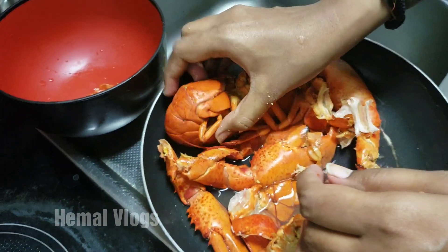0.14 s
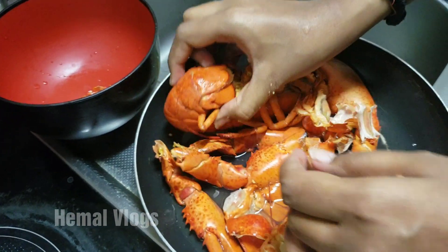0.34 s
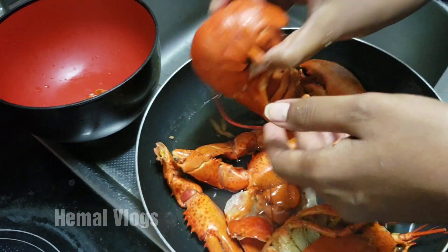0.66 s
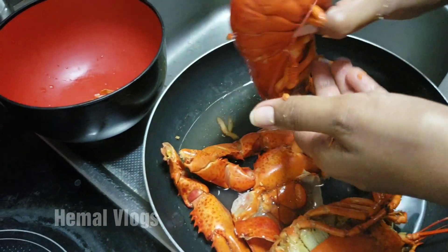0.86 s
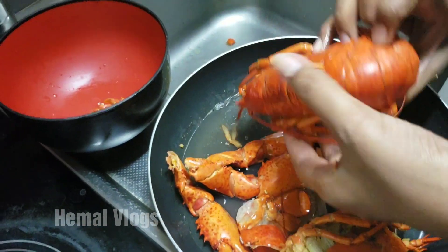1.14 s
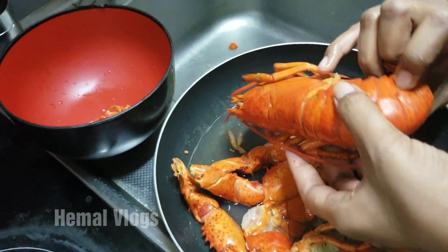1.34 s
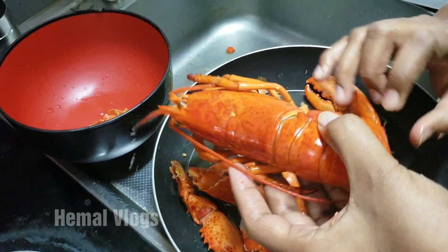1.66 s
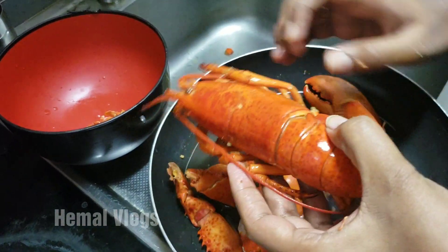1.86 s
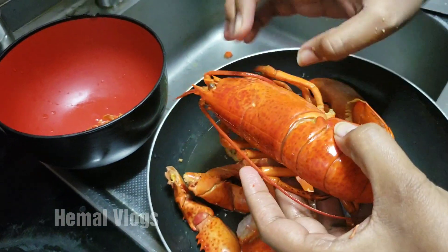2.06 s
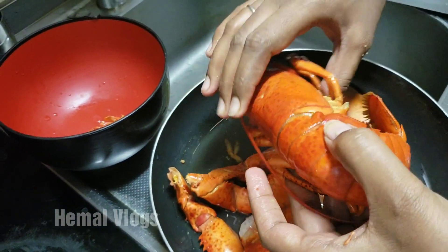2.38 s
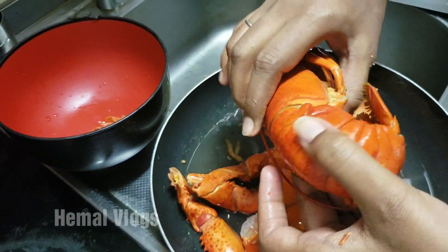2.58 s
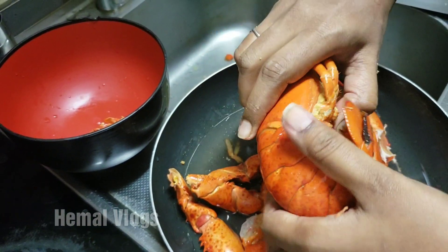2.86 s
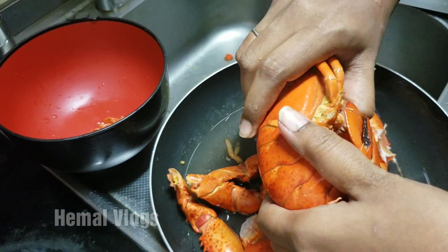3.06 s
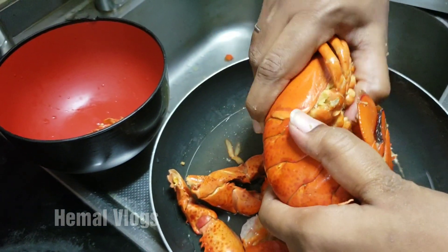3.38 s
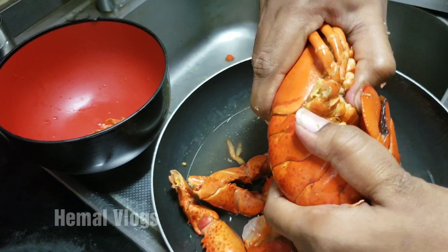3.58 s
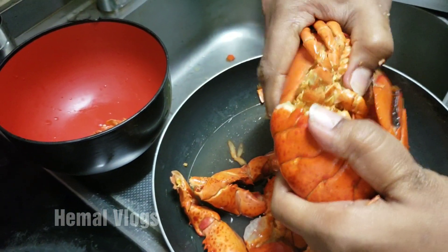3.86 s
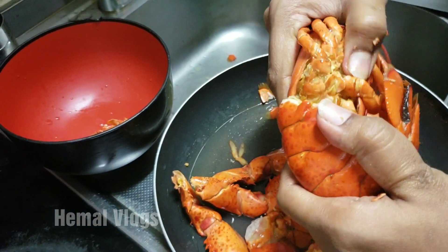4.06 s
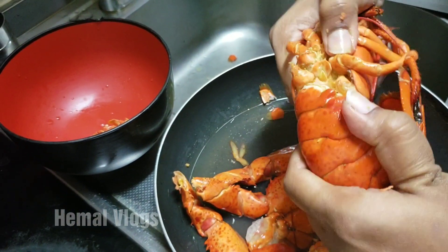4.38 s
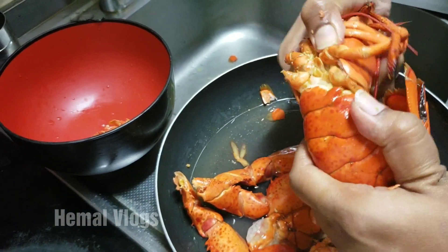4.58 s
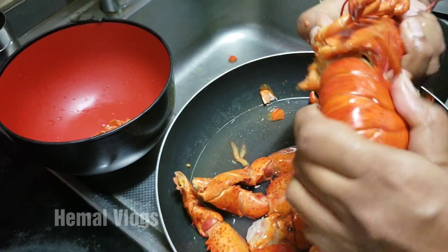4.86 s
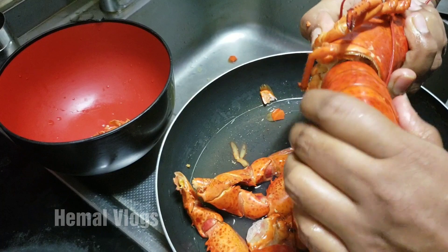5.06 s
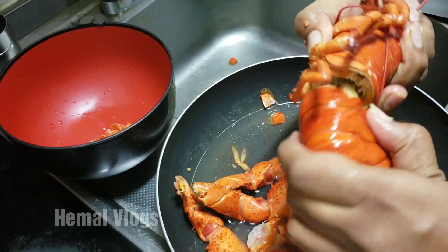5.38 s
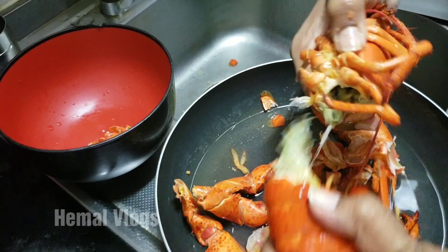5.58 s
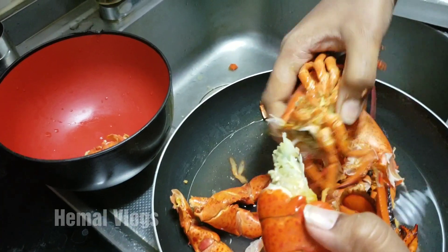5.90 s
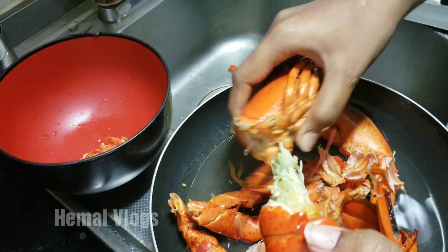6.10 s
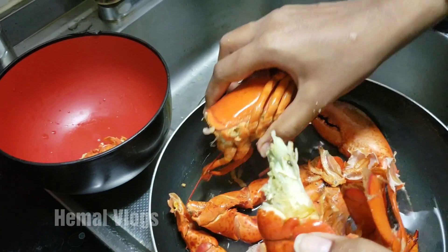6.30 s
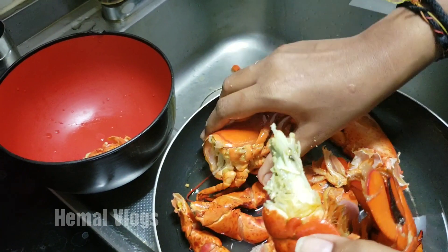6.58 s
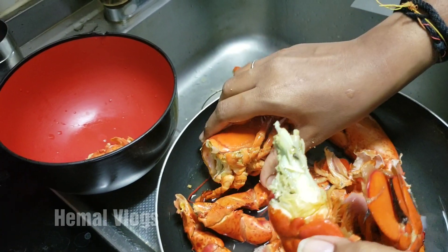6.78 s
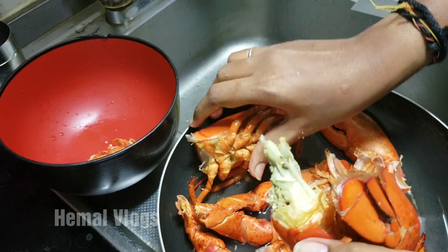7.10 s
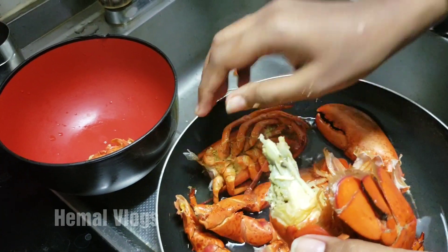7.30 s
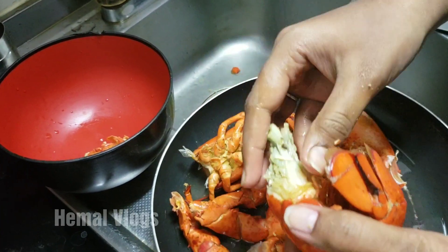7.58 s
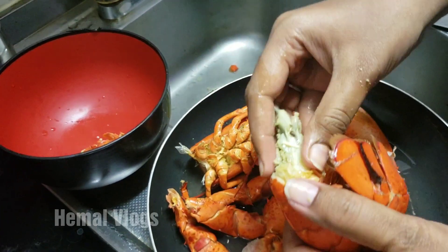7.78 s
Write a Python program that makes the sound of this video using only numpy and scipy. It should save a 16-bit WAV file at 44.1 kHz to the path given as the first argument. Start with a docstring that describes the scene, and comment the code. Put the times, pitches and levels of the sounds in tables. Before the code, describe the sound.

Sharp brittle cracks of a cooked lobster shell, with wet crackling, crunches and soft pan thumps close by in a small humming kitchen.

```python
"""Cracking shellfish in a small kitchen

Hands crack a cooked shellfish and tear out its wet meat over a pan in a small hard-walled kitchen.
Each crack is a burst of tiny fractures that rings the shell; pieces of it crunch and snap, low or high.
Legs and meat crackle and rub in dense clicks, the pan thumps and rattles in the sink as low tones and noise,
and an appliance hums in the room as shaped noise. A small two-port microphone stands close by."""
import sys
import numpy as np
from scipy import signal
from scipy.fft import rfft, irfft
from scipy.io import wavfile
from scipy.ndimage import uniform_filter1d

SR = 44100
rng = np.random.default_rng(int(sys.argv[2]) if len(sys.argv) > 2 else 0)


def unload_wav(signal):
    """Save mono or channel-first audio to the path in sys.argv[1] as 16-bit WAV at rate SR, clipped to [-1, 1]."""
    wavfile.write(
        sys.argv[1],
        SR,
        np.round(np.clip(np.atleast_2d(signal).T, -1, 1) * 32767).astype(np.int16),
    )


N = 350154   # samples, about 7.9 s

# Breaks of the shell. Each row: start in seconds, level in dB, thick wall in dB relative to that level,
# splinter in dB relative to it, time in seconds for the fractures to die by 60 dB.
CRACKS = [(0.274, -34.5, -12, -28, 0.038), (0.332, -30.5, -13, -27, 0.041), (0.612, -39.5, -19, -18, 0.099),
          (0.7555, -46, 7, 2, 0.043), (0.869, -38, -4.5, -7, 0.11), (1.142, -9, -22, 1, 0.069),
          (1.3605, -30.5, -15, 9, 0.018), (1.371, -44.5, -3.5, 11, 0.086), (1.4441, -22, -40, 12.5, 0.053),
          (1.449, -35, -28, 21.5, 0.04), (1.4501, -12.5, -55, -13, 0.054), (1.4606, -20, -46, -24, 0.027),
          (1.4752, -24, -40, 2, 0.053), (1.5143, -36.5, 0.5, 6, 0.035), (1.684, -63.5, 13, -20, 0.034),
          (3.015, -48, -18, 14, 0.079), (3.1316, -53, -25, 12, 0.1), (3.1659, -37.5, -14, 11, 0.03),
          (3.495, -60, -15, -1, 0.13), (3.595, -37.5, -20, -25, 0.078), (3.6274, -42.5, -19, 0, 0.3),
          (3.685, -27.5, -3.5, -5.5, 0.092), (3.7498, -37, -4, -19, 0.044), (3.758, -19.5, -4.5, -2, 0.067),
          (3.839, -29, -11.5, 0, 0.061), (3.8853, -10.5, -11, -1.5, 0.074),
          (3.8951, -18.5, -0.5, -9, 0.039), (3.923, -31, -22, 20, 0.012), (3.9292, -27, -1.5, -21, 0.13),
          (3.956, -26, -7, -2, 0.1), (4.034, -45, -30, 8, 0.055), (4.156, -33, -3, 1, 0.041),
          (4.1683, -54, -22, 23, 0.066), (4.193, -23.5, -11, 3, 0.07), (4.2524, -41.5, 1, -22, 0.049),
          (4.3283, -24, -2, 0.5, 0.084), (4.4049, -26, 2, -2.5, 0.077), (4.4179, -38.5, 12.5, -6, 0.016),
          (4.462, -37.5, 6.5, -2, 0.023), (4.4783, -40, 7.5, 2, 0.073), (4.6405, -31.5, -15, 10.5, 0.017),
          (4.7278, -31.5, -1.5, -14, 0.15), (4.8339, -36, -24, -2, 0.04), (4.8914, -24.5, -8.5, 2.5, 0.051),
          (5.552, -26.5, -15, 2, 0.032), (5.602, -40, -9, 7, 0.056), (6.112, -58, -29, 20, 0.046),
          (6.233, -50.5, -36.5, 2, 0.16), (6.6636, -23, -7, 3, 0.081), (7.3285, -26.5, -11, -4, 0.11)]
# The hollow body knocks as a large piece gives way. Each row: start in seconds, level in dB.
KNOCKS = [(0.282, -52), (0.61, -45), (3.9, -44), (3.957, -34)]
# A piece of shell snaps, low or high. Each row: start in seconds, level in dB, pitch in Hz, width in Hz per pass.
SNAPS = [(1.4445, -22, 9000, 6000), (3.904, -19, 12900, 2500), (3.9152, -17, 13200, 3000),
         (3.9217, -14, 13300, 1500), (3.9572, -20, 12500, 2000), (3.9578, -26, 950, 500),
         (3.959, -31, 350, 250), (4.1933, -24, 6000, 4000), (4.4186, -29, 2500, 2000)]
# Short crunches of flakes or joints, and a longer low rub, each at a pitch of its own.
# Each row: start in seconds, level in dB, pitch in Hz, width in Hz per pass, length in seconds before it dies away.
CRUNCHES = [(0.042, -62.5, 614, 520, 0.37), (0.154, -59, 6500, 2500, 0.008), (0.27, -55, 1780, 700, 0.0082),
            (0.314, -58, 2070, 600, 0.0049), (0.645, -55.5, 4440, 500, 0.068),
            (0.752, -55, 1800, 400, 0.014), (0.794, -51.5, 4660, 700, 0.0096),
            (0.795, -54, 6200, 900, 0.005), (1.955, -70.5, 2320, 950, 0.028),
            (2.988, -67, 2300, 1200, 0.011), (3.016, -53, 6100, 1100, 0.02),
            (3.017, -55.5, 2470, 800, 0.02), (3.157, -52, 6900, 1500, 0.011),
            (3.748, -35, 6700, 1800, 0.001), (3.894, -33, 12500, 2500, 0.003),
            (3.927, -48, 13000, 2500, 0.003), (3.933, -40.5, 990, 500, 0.003),
            (3.9563, -51, 930, 450, 0.0048), (3.957, -51.5, 297, 199, 0.012),
            (3.9572, -33, 12300, 2500, 0.002), (4.281, -65, 2400, 900, 0.0075),
            (1.454, -38.5, 4580, 900, 0.033), (1.374, -51.5, 4600, 900, 0.015),
            (1.52, -51, 1500, 900, 0.0056), (6.654, -53.5, 654, 498, 0.02), (4.252, -52, 5170, 900, 0.004),
            (4.258, -66, 2390, 600, 0.017), (4.318, -68, 2600, 500, 0.012),
            (4.404, -39.5, 5230, 800, 0.0043), (4.457, -47, 6630, 1500, 0.01),
            (4.481, -48, 2340, 900, 0.0094), (4.708, -51, 6000, 3000, 0.0054),
            (4.732, -47, 2300, 700, 0.016), (4.74, -40, 14300, 2500, 0.012),
            (4.834, -45, 11800, 2200, 0.006), (4.848, -46, 4730, 800, 0.026),
            (4.892, -40, 5100, 900, 0.011), (4.947, -48, 12300, 2500, 0.01), (4.964, -49, 4970, 450, 0.013),
            (5.04, -65, 13200, 2500, 0.0069), (5.534, -62, 5000, 3000, 0.0035),
            (5.554, -44.5, 3080, 700, 0.0073), (5.633, -52, 6400, 900, 0.015),
            (5.684, -52.5, 6300, 1600, 0.0046), (6.024, -48, 13800, 2600, 0.0086),
            (6.112, -44, 7060, 1500, 0.0084), (6.178, -62, 5500, 1500, 0.004),
            (6.229, -52.5, 9570, 4020, 0.025), (6.413, -52, 14000, 2600, 0.006),
            (7.05, -67.5, 5940, 1510, 0.049), (4.418, -40.5, 1210, 895, 0.0057),
            (4.416, -58, 2200, 700, 0.022), (7.227, -61, 2300, 500, 0.0058),
            (7.229, -57.5, 1240, 300, 0.0091), (7.319, -51, 1210, 302, 0.043),
            (7.331, -37, 6100, 1410, 0.0065)]
# Broad resonances of hollow body, thick wall, thin plate and splinter.
# Each row: pitch in Hz, width in Hz per pass, gain in dB per pass.
BODY = [(320, 260, 10.5), (572, 125, 14.5), (760, 500, 9.5)]
WALL = [(1173, 756, -0.5), (1935, 404, 5), (2510, 1480, 1)]
PLATE = [(3408, 1300, 1.7), (4440, 2180, 5.02), (6890, 2570, 3.27)]
SPLINTER = [(9680, 5100, -45), (12700, 7700, 8), (15500, 4900, -1)]
# Bouts of handling shell and meat, a list of rows for each bout.
# Each row: time in seconds, rub level in dB, thick wall in dB relative to the rub.
HANDLING = [
    [(0.0, -57.5, -3), (0.18, -61.5, -6), (0.388, -66.5, -7), (0.5, -66.5, -9)],
    [(0.5, -70.5, -20), (0.774, -61.5, -16), (0.898, -68.5, -3), (1.1, -79, -10)],
    [(1.5, -63, -8), (1.656, -73, -4), (1.8, -106, -11)],
    [(2.95, -90, -1), (3.248, -91, -6), (3.422, -67.5, -5.5), (3.502, -100, -9), (3.6, -69, -1)],
    [(3.6, -77.5, 3.5), (3.762, -57, -6), (3.862, -83, 12), (4.008, -61.5, -20), (4.15, -63, -11)],
    [(4.15, -91, -1), (4.22, -65, 0), (4.344, -69, 3), (4.46, -63, 0), (4.6, -100, -13)],
    [(4.6, -62.5, -6), (4.7, -62.5, -11), (4.81, -55, -15), (4.848, -58.5, 3), (4.98, -71, 1),
     (5.1, -71, -4.5)],
    [(5.1, -68, -10), (5.218, -78.5, -3), (5.452, -83, -2.5), (5.754, -72.5, -4.5), (5.8, -86, -21)],
    [(5.8, -72, -17), (5.948, -86, -18), (6.1, -100, -12)],
    [(6.6, -75, -16), (6.674, -68, 8), (6.794, -79, -10), (6.85, -90, -9)],
    [(7.0, -90.5, -15), (7.116, -114, -16), (7.248, -71, 5), (7.5, -109, -2)],
]
# Meat tears or shell scrapes in one stroke. Each row: time of the height in seconds, rub level in dB,
# thick wall in dB relative to the rub, splinter in dB relative to it, rise in seconds, fall in seconds.
TEARS = [(0.07, -70.5, -6, 22, 0.067, 0.062), (0.33, -54.5, -5, -5, 0.16, 0.094),
         (0.69, -54.5, -2, -15, 0.12, 0.18), (0.8, -63, 2, -17, 0.037, 0.041),
         (1.531, -57.5, 1.5, -10, 0.047, 0.068), (3.025, -57, -9.5, -2.5, 0.03, 0.08),
         (3.168, -57, -6, 3.5, 0.025, 0.071), (3.53, -60, -15, -9, 0.031, 0.05),
         (4.166, -53.5, 0, -9, 0.014, 0.005), (4.418, -50.5, -5, 1, 0.071, 0.1),
         (4.737, -44, -6, -1, 0.04, 0.084), (4.84, -44, -22, -7, 0.037, 0.094),
         (4.89, -56, -14, 3, 0.034, 0.028), (4.967, -44.5, -8.5, -1.5, 0.086, 0.014),
         (5.598, -46, -5, -5, 0.035, 0.04), (5.643, -51, -11, 3.5, 0.08, 0.059),
         (5.951, -68.5, -11.5, 2, 0.068, 0.025), (6.646, -46, -14.5, -9, 0.018, 0.017),
         (7.07, -66.5, -14.5, 5.5, 0.034, 0.051), (7.226, -57.5, -7, -3.5, 0.0085, 0.12),
         (7.331, -48, 2, -2, 0.081, 0.057)]
# Pan knocked. Each row: start in seconds, level in dB, pitch in Hz.
THUMPS = [(0.594, -58, 90), (2.758, -41.5, 85), (6.667, -30.5, 111.5), (7.098, -46, 144.5),
          (7.246, -35.5, 60.6), (7.378, -40.5, 206)]
# Hands jolt pan and sink. Each row: time of the height in seconds, rumble in dB, rattle in dB,
# rise in seconds, fall in seconds.
JOLTS = [(0.2, -52, -52, 0.73, 0.68), (0.35, -65, -52.5, 0.16, 0.09), (0.599, -51, -50, 0.015, 0.078),
         (0.75, -64, -59.5, 0.16, 0.23), (1.77, -58, -63, 0.062, 0.054), (2, -52.5, -68.5, 0.058, 0.027),
         (2.821, -58.5, -64, 0.037, 0.47), (3.89, -59, -54, 0.012, 0.11), (5.59, -53, -62, 0.052, 0.063),
         (6.683, -39, -49, 0.028, 0.15), (7.1, -62.5, -62, 0.29, 0.096), (7.28, -53.5, -53, 0.12, 0.17),
         (7.38, -55.5, -63, 0.1, 0.27)]
# Spectra of the pan's rumble and rattle. Each row: frequency in Hz, relative density in dB per Hz.
RUMBLE_COLOUR = [(18, -30.5), (30, -8), (46, -1), (59, 3.5), (140, -3), (180, -54.5), (310, -120)]
RATTLE_COLOUR = [(82, -46.5), (140, 3), (258, -7), (296, 3.5), (420, -15.5), (550, -23.5), (920, -120)]
# Spectrum of the appliance. Each row: frequency in Hz, relative density in dB per Hz.
HUM_COLOUR = [(15, -49), (25, -26.5), (38, -26.5), (87, -1), (161, -27), (301, -17.5), (384, -23.5),
              (545, -18), (936, -34.5), (1100, -32), (1940, -40.5), (2350, -32), (2550, -43.5),
              (5730, -34.5), (16000, -35)]
# Fan resonances. Each row: pitch in Hz, width in Hz, level in dB before it wavers.
HUM_PEAKS = [(333.8, 6.9, -77.5), (529.2, 26.7, -72.5)]
# How alike noise is at the two ports. Each row: frequency in Hz, left-right likeness from 0 to 1.
LIKENESS = [(60, 0.91), (130, 0.85), (290, 0.65), (640, 0), (1400, 0), (15000, 0)]
# Colour of the two ports. Each row: frequency in Hz, left minus right in dB.
PORT_TILT = [(60, 0.5), (150, 4), (380, -6), (950, 0.5), (2380, -1.5), (5980, -3.5), (15000, -8)]

CRACK_LEVEL_DB, FIRST_BREAK_DB = -13.0, 15   # all cracks; first break over the rms of the shower
BODY_FOLLOWS, BODY_UNDER_DB = 0.93, -13.5    # the deeper the break, the more the hollow body joins in
KNOCK_T60_S = 0.02
BODY_SHARED = 0.48   # the share of the hollow body's force that both ports hear in common
SPREAD = 0.95        # power share of the small fractures that each port hears on its own
PIECE_LOW_HZ, PIECE_HIGH_HZ, PIECE_WIDTH_HZ, PIECE_DB = 3200, 8000, 220, -9
CRUNCH_RISE_S, CRUNCH_T60_S, CRUNCH_ONSET_DB = 0.001, 0.014, 13   # first click over the row's level
RUB_BODY_UNDER_DB, RUB_SPLINTER_DB = -7.5, 1.5   # body re wall; splinter re rub, outside the tears
COLOUR_WANDER_DB = 2.5   # the rubbing moves over thick and thin parts of the shell
STROKE_RANGE_DB = 20     # a stroke changes this much over its rise or fall time
THUMP_T60_S, THUMP_SWELL_S = 0.17, 0.0068   # a soft contact
REST_RUMBLE_DB, REST_RATTLE_DB, REST_WAVER_DB = -64.5, -77, 2   # the pan is never quite still
ROOM_T60_S, ROOM_DB, WALL_CUT_HZ = .12, -10.5, 7000
LATE_T60_S, LATE_DB = 0.27, -7   # the fainter, longer tail of the room beyond the sink
HUM_DB, HUM_WAVER_DB, THROB_DB = -64, .8, 4.5
PORT_LAG_S = .00005
NOTCH_HZ, NOTCH_WIDTH_HZ, NOTCH_DB = 8710, 2990, -7.5
PEAK_TOP, TOP_HZ = .34, 16000   # ceiling of the rounded peaks; treble edge


def cracks():
    """A first break, then a dying shower of small fractures; each part of the shell gets its own."""
    force = np.zeros((4, 2, N))   # body, wall, plate, splinter; left and right
    t = np.arange(SR // 4) / SR
    shower = np.array([scattered(1200, spread_db=4.5) for part in force])
    for s, level_db, depth_db, splinter_db, t60 in CRACKS:
        i = round(s * SR)
        burst = shower[:, :, i:i + len(t)] * from_db(-60 * t[:N - i] / t60)
        burst[:, :, 0] = from_db(FIRST_BREAK_DB)
        body_db = BODY_FOLLOWS * depth_db + BODY_UNDER_DB
        colour_db = np.array([body_db, depth_db, 0, splinter_db])
        colour = from_db(level_db + CRACK_LEVEL_DB + colour_db)
        force[:, :, i:i + len(t)] += colour[:, None, None] * burst
    add_knocks(force[0], shower[0, 0], t)
    return shell(force) + pieces(force[2])


def add_knocks(body_force, shower, t):
    """A large piece gives way: a very short run of fractures, alike at both ports, drives the body."""
    for s, level_db in KNOCKS:
        i = round(s * SR)
        fall = from_db(level_db - 60 * t[:N - i] / KNOCK_T60_S)
        body_force[:, i:i + len(t)] += shower[i:i + len(t)] * fall


def shell(force):
    """The force on each part of the shell rings that part's broad resonances."""
    body, *others = force
    common = body.sum(axis=0) / np.sqrt(2)
    body = (1 - BODY_SHARED) * body + BODY_SHARED * common
    groups = (BODY, WALL, PLATE, SPLINTER)
    return sum(ring_twice(f, modes) for f, modes in zip([body, *others], groups))


def pieces(force, count=5):
    """Each crack frees pieces of its own size: narrow resonances at chance pitches that ring briefly."""
    out, span, click = np.zeros((2, N)), SR // 8, np.eye(1, 3000)[0]
    chance = rng.random((len(CRACKS), count))
    starts = [round(row[0] * SR) for row in CRACKS] + [N]
    for i, after, draw in zip(starts, starts[1:], chance):
        pitches = np.sort(PIECE_LOW_HZ * (PIECE_HIGH_HZ / PIECE_LOW_HZ) ** draw)
        modes = [(hz, PIECE_WIDTH_HZ, 0) for hz in pitches]
        own = force[:, i:i + span] * (np.arange(i, i + span) < after)   # driven until the next crack
        out[:, i:i + span] += resonate(own, modes) / np.linalg.norm(resonate(click, modes))
    return from_db(PIECE_DB) * out


def snaps():
    """A piece of shell snaps, low or high: one click through one resonance, twice for steep flanks."""
    out, click = np.zeros(N), np.eye(1, 400)[0]
    for s, level_db, hz, width in SNAPS:
        mode = [(hz, width, 0)]
        rung = resonate(resonate(click, mode), mode)
        out[round(s * SR):][:len(rung)] += from_db(level_db) * rung / np.abs(rung).max()
    return out


def crunches():
    """Each crunch or rub is a first click and a run of small fractures, ringing in one resonance."""
    out, shower = np.zeros((2, N)), scattered(1500, spread_db=1.5)
    for s, level_db, hz, width, length_s in CRUNCHES:
        i = round(s * SR)
        t = np.arange(min(round((length_s + 3 * CRUNCH_T60_S) * SR), N - i)) / SR
        rise = 1 - np.exp(-t / CRUNCH_RISE_S)
        fall_db = -60 * np.clip(t - length_s, 0, None) / CRUNCH_T60_S
        force = shower[:, i:i + len(t)] * rise * from_db(level_db + fall_db)
        force[:, 0] = from_db(level_db + CRUNCH_ONSET_DB)
        out[:, i:i + len(t)] += ring_twice(force, [(hz, width, 0)])
    return out


def handling():
    """Legs scrape and wet meat parts: dense small clicks that come in clumps, over a smooth rub."""
    t = np.arange(N) / SR
    rub_db, depth_db = in_time(np.concatenate(HANDLING))
    busy = sum((t >= bout[0][0]) & (t < bout[-1][0]) for bout in HANDLING)
    gate = uniform_filter1d(np.minimum(busy, 1.), size=1000)
    plate = gate * from_db(rub_db)
    wall, splinter = plate * from_db(depth_db), plate * from_db(RUB_SPLINTER_DB)
    for s, tear_db, tear_depth_db, splinter_db, rise_s, fall_s in TEARS:
        tear = from_db(tear_db + stroke_db(t, s, rise_s, fall_s))
        plate = np.hypot(plate, tear)
        wall = np.hypot(wall, tear * from_db(tear_depth_db))
        splinter = np.hypot(splinter, tear * from_db(splinter_db))
    parts = [wall * from_db(RUB_BODY_UNDER_DB), wall, plate, splinter]
    wander = from_db([COLOUR_WANDER_DB * drift(6.7) for part in parts])
    clicks_per_s = 800 * from_db(6.2 * drift(25))   # the clumps
    smooth = 0.5 * rng.standard_normal((2, N))
    crackle = rms_one(scattered(clicks_per_s, spread_db=0.5) + smooth)
    return shell(crackle * (parts * wander)[:, None])


def pan():
    """Knocks ring pan and sink low and briefly; hands keep them shaking and rattling, alike at both ports."""
    t, out = np.arange(N) / SR, np.zeros(N)
    for s, level_db, hz in THUMPS:
        age = np.clip(t - s, 0, None)
        swell = 1 - np.exp(-age / THUMP_SWELL_S)
        out += from_db(level_db - 60 * age / THUMP_T60_S) * swell * np.sin(2 * np.pi * hz * age)
    rumble, rattle = shaking(t)
    return out + rumble * stereo_noise(RUMBLE_COLOUR)[0] + rattle * stereo_noise(RATTLE_COLOUR)[0]


def shaking(t):
    """Gains of rumble and rattle: a wavering rest, and jolts above it."""
    rumble_rest_db = REST_RUMBLE_DB + REST_WAVER_DB * drift(4.9)
    rattle_rest_db = REST_RATTLE_DB + REST_WAVER_DB * drift(2.6)
    gains = from_db([rumble_rest_db, rattle_rest_db])
    for s, rumble_db, rattle_db, rise_s, fall_s in JOLTS:
        jolt_db = [[rumble_db], [rattle_db]] + stroke_db(t, s, rise_s, fall_s)
        gains = np.hypot(gains, from_db(jolt_db))
    return gains


def kitchen(x):
    """Diffuse echoes of sink and tiles: dying noise of its own for each port, duller as it dies."""
    t = np.arange(SR // 2) / SR
    bright = rng.standard_normal((2, len(t)))
    dull = signal.sosfilt(signal.butter(1, WALL_CUT_HZ, fs=SR, output="sos"), bright)
    fall = from_db(-60 * t / ROOM_T60_S) + from_db(LATE_DB - 60 * t / LATE_T60_S)
    treble = (bright - dull) * from_db(-30 * t / ROOM_T60_S)
    tail = (dull + treble) * fall * (t > .002)   # nearest walls answer after 2 ms
    return signal.fftconvolve(np.atleast_2d(x), tail / np.linalg.norm(tail[0]), axes=1)[:, :N]


def hum():
    """Appliance in the room: wavering noise, and two fan resonances that throb irregularly."""
    out = from_db(HUM_DB + HUM_WAVER_DB * drift(1.8)) * stereo_noise(HUM_COLOUR)
    for hz, width, level_db in HUM_PEAKS:
        tone = rms_one(resonate(rng.standard_normal(N), [(hz, width, 0)]))
        out += from_db(level_db + THROB_DB * drift(17)) * tone
    return out


def stereo_noise(spectrum):
    """Noise with a spectrum, alike left and right in the bass only; rms 1."""
    hz = np.fft.rfftfreq(N, 1 / SR)
    mid, side = rfft(rng.standard_normal((2, N))) * from_db(at_hz(spectrum, hz))
    alike = at_hz(LIKENESS, hz)
    return rms_one(irfft(np.sqrt(1 + alike) * mid + np.sqrt(1 - alike) * side * [[1], [-1]], N))


def scattered(per_s, spread_db):
    """Clicks from all over the shell: partly shared by the ports, partly heard by one."""
    shared, left, right = (grains(per_s, spread_db) for draw in range(3))
    return np.sqrt(1 - SPREAD) * shared + np.sqrt(SPREAD) * np.array([left, right])


def grains(per_s, spread_db):
    """Random clicks of uneven size and either sign; rms 1."""
    steps = np.minimum(rng.exponential(1, N), 3.5)
    sizes = from_db(spread_db * steps) * rng.choice([-1, 1], N)
    return rms_one(sizes * (rng.random(N) < per_s / SR))


def resonate(x, modes):
    """Parallel resonances of alternating sign; each mode is pitch in Hz, width in Hz, peak gain in dB."""
    out = 0
    for k, (hz, width, gain_db) in enumerate(modes):
        r = np.exp(-np.pi * width / SR)
        top = (1 - r * r) / 2 * from_db(gain_db) * (-1) ** k
        poles = [1, -2 * r * np.cos(2 * np.pi * hz / SR), r * r]
        out = out + signal.lfilter([top, 0, -top], poles, x + 1e-18)
    return out


def ring_twice(x, modes):
    """Resonances passed twice for steep flanks, evened to unit gain for noise."""
    click = np.eye(1, 3000)[0]
    return resonate(resonate(x, modes), modes) / np.linalg.norm(resonate(resonate(click, modes), modes))


def stroke_db(t, s, rise_s, fall_s):
    """A stroke's level rises and falls evenly in dB about its height."""
    return -STROKE_RANGE_DB * np.where(t < s, (s - t) / rise_s, (t - s) / fall_s)


def drift(rate_hz):
    """Slow chance of spread 1: noise through two equal low-pass poles, at one value per 40 samples."""
    r = np.exp(-80 * np.pi * rate_hz / SR)
    slow = signal.lfilter([1], [1, -2 * r, r * r], rng.standard_normal(N // 40 + 2002))[2000:]
    return np.interp(np.arange(N) / 40, np.arange(len(slow)), rms_one(slow))


def in_time(rows):
    """Columns of a curve table, one value a sample."""
    s, *columns = np.transpose(rows)
    return np.array([np.interp(np.arange(N) / SR, s, c) for c in columns])


def at_hz(points, hz):
    """A spectrum table read on a log-frequency axis."""
    table_hz, values = np.transpose(points)
    return np.interp(np.log(hz + 1), np.log(table_hz + 1), values)


def from_db(db):
    """Decibels to gain."""
    return 10 ** (np.asarray(db) / 20)


def rms_one(x):
    """Scale to rms 1."""
    return x / np.sqrt(np.mean(x ** 2) + 1e-20)


def scene():
    """The shell close by reaches the right port a little first; room echoes, pan and hum join it."""
    left, right = cracks() + handling() + crunches() + snaps()
    late = np.interp(np.arange(N) - PORT_LAG_S * SR, np.arange(N), left)
    echoes = from_db(ROOM_DB) * kitchen(left + right)
    return np.array([late, right]) + echoes + pan() + hum()


def dip_before_jumps(x, ahead_s=0.0084, jump_db=18.5, slope=3.54):
    """The level dips briefly just before a sudden jump in treble."""
    treble = signal.sosfilt(signal.butter(2, 1500, "high", fs=SR, output="sos"), x.mean(axis=0))
    level_db = 10 * np.log10(uniform_filter1d(treble ** 2, size=180) + 1e-12)
    lead = round(ahead_s * SR)
    jump = np.append(level_db[lead:] - level_db[:-lead], np.zeros(lead))
    return x * from_db(-slope * np.clip(jump - jump_db, 0, 25))


def low_pass(x):
    """Removes everything above the highest recorded frequency."""
    return signal.sosfilt(signal.butter(12, 16810, fs=SR, output="sos"), x)


def record(dry):
    """The ports differ in colour and share a notch from the housing; then rounded peaks, dips, treble cut."""
    hz = np.fft.rfftfreq(N, 1 / SR)
    tilt_db = at_hz(PORT_TILT, hz) / 2
    notch_db = NOTCH_DB * np.exp(-((hz - NOTCH_HZ) / NOTCH_WIDTH_HZ) ** 2)
    ports = irfft(rfft(dry) * from_db([tilt_db, -tilt_db] + notch_db), N)
    rounded = PEAK_TOP * np.tanh(ports / PEAK_TOP)
    treble_cut = signal.cheby2(14, 24, TOP_HZ, fs=SR, output="sos")
    mix = signal.sosfilt(treble_cut, dip_before_jumps(rounded))
    return low_pass(mix)


dry = scene()
out = record(dry)
unload_wav(out)
```